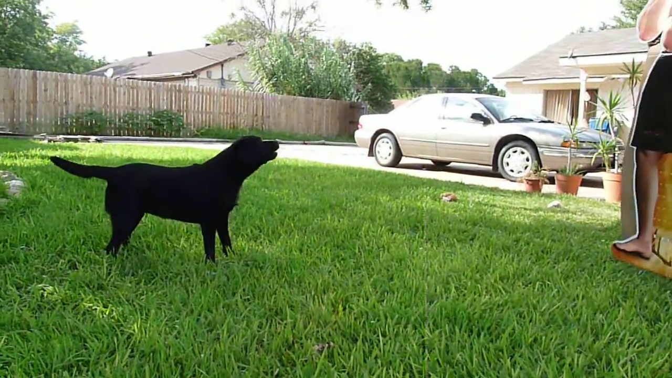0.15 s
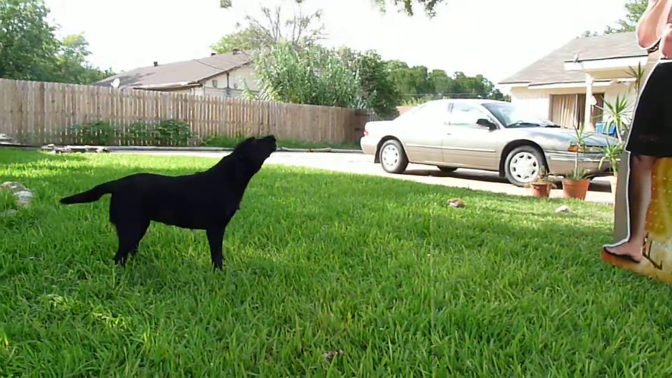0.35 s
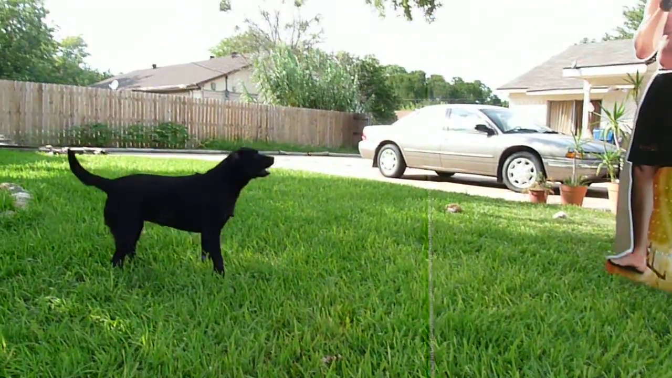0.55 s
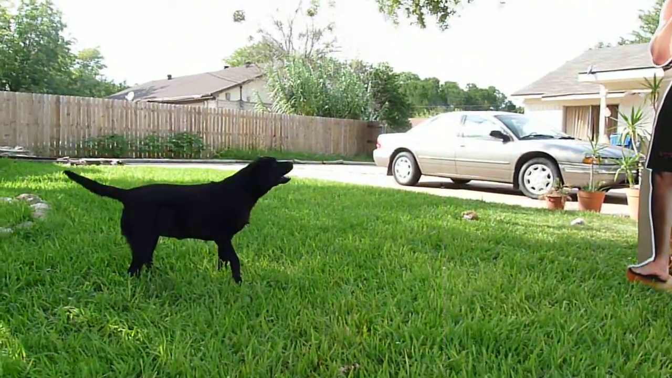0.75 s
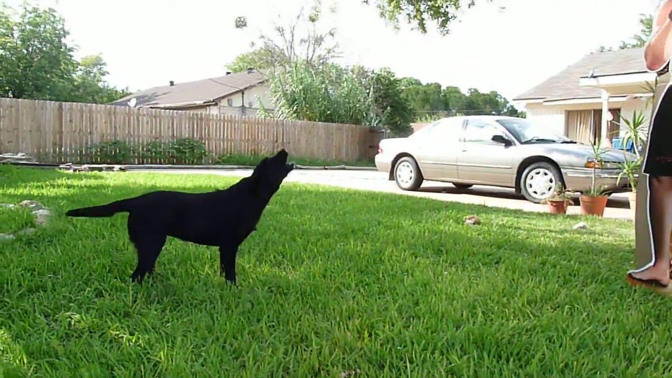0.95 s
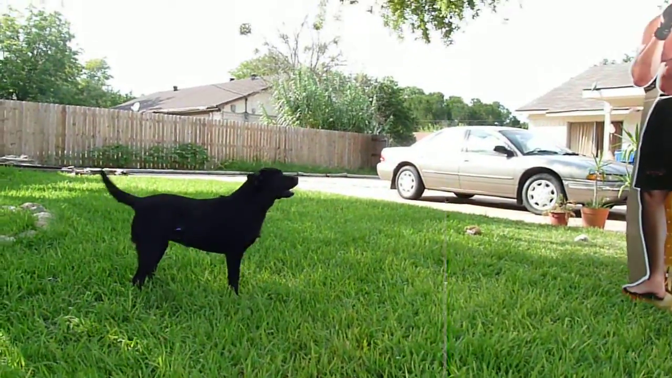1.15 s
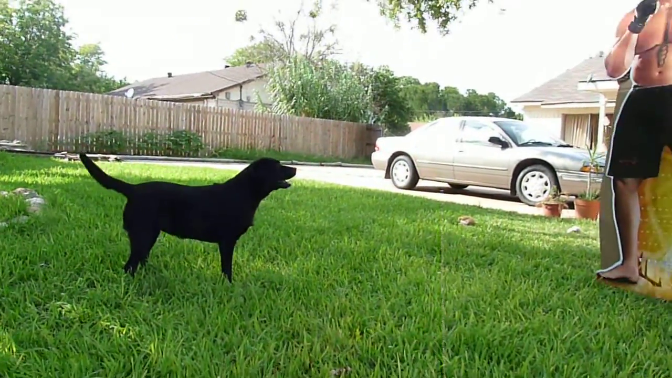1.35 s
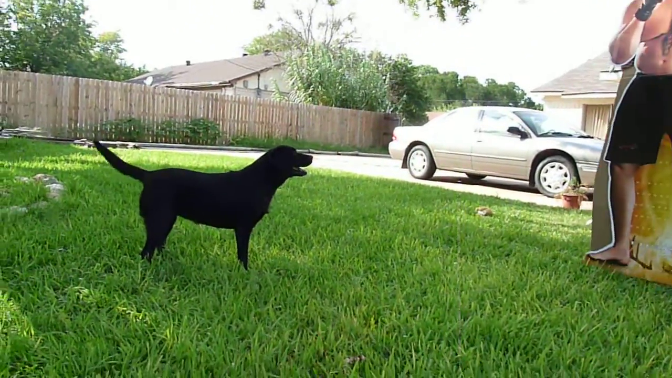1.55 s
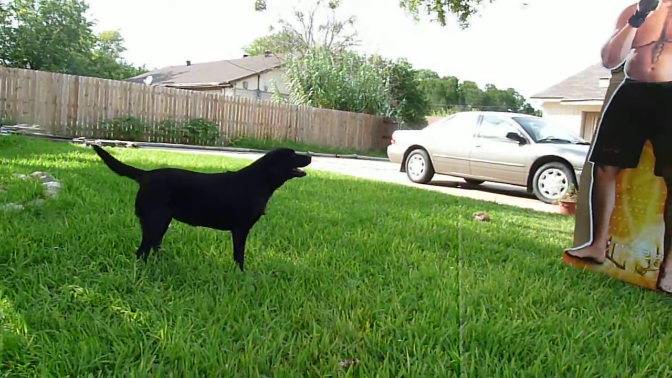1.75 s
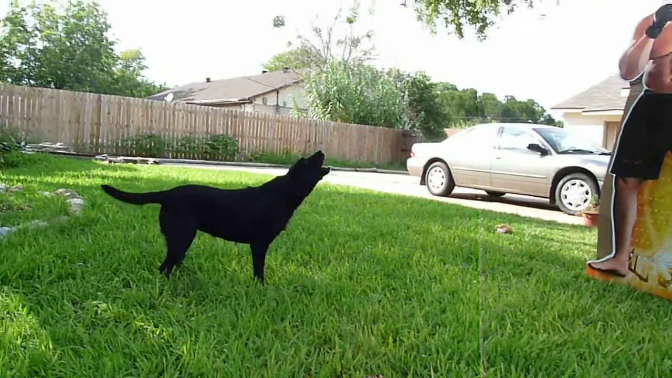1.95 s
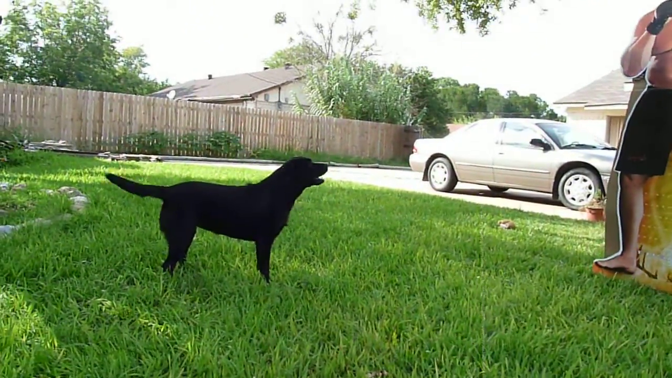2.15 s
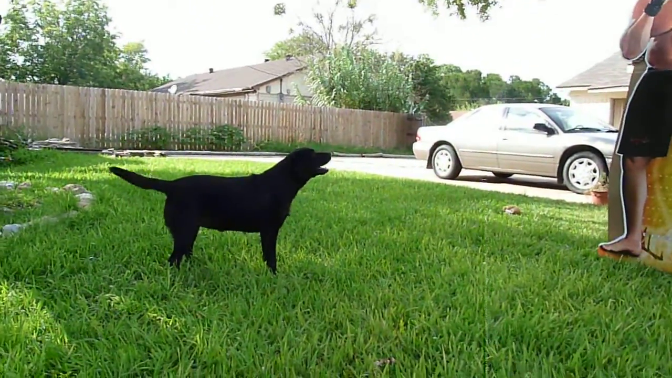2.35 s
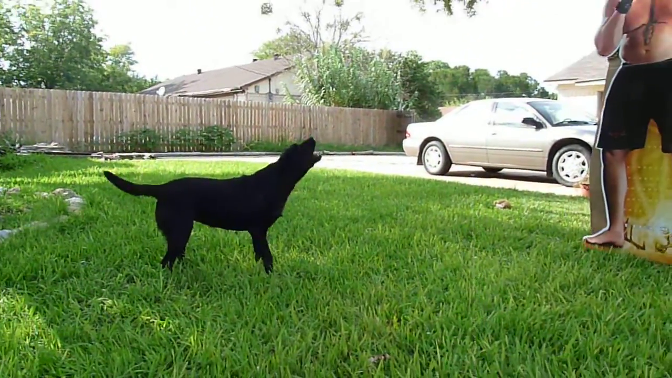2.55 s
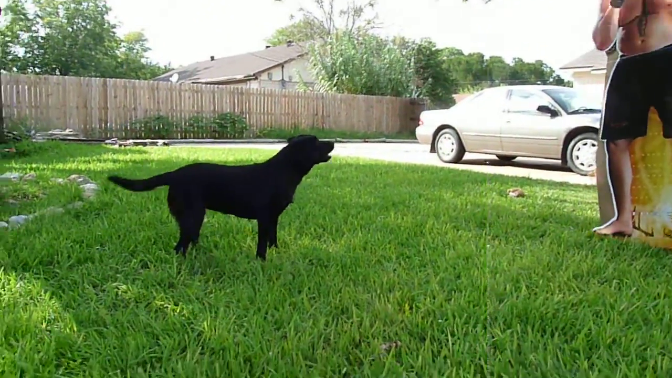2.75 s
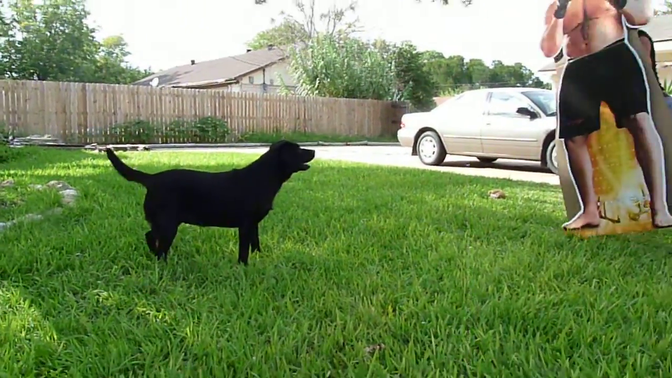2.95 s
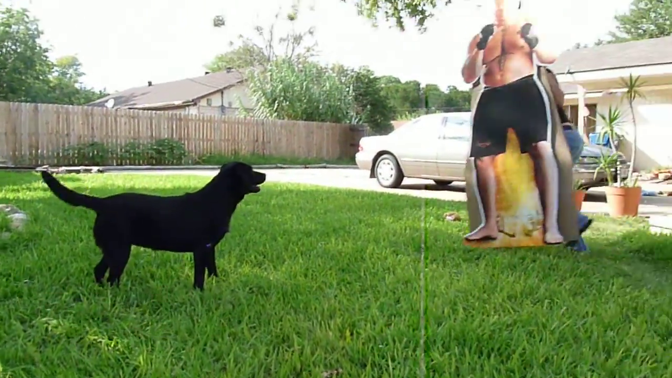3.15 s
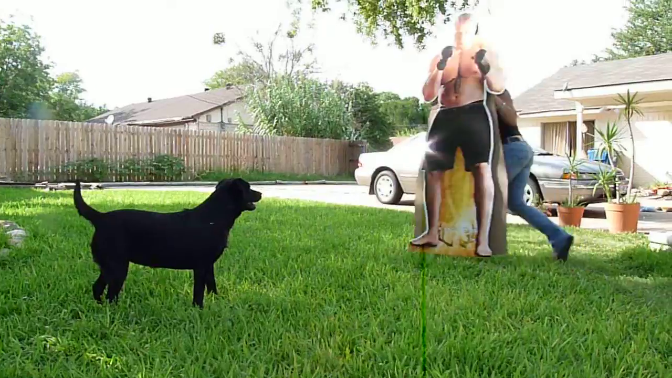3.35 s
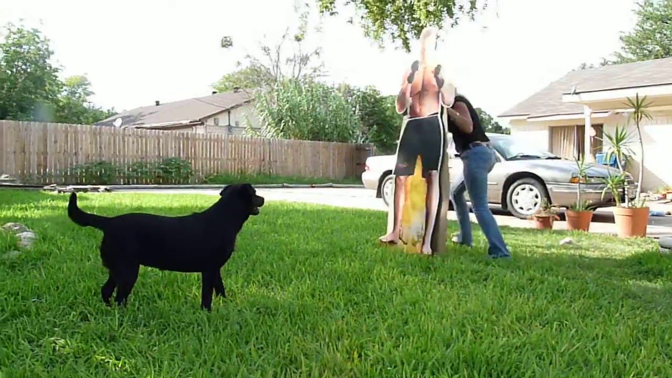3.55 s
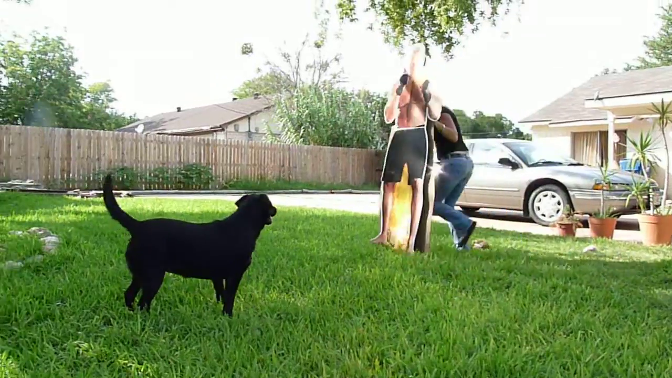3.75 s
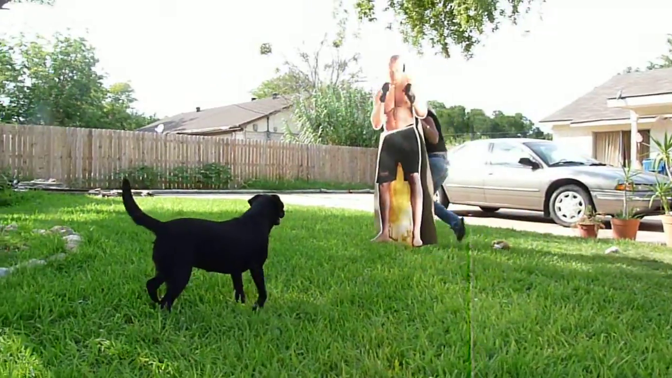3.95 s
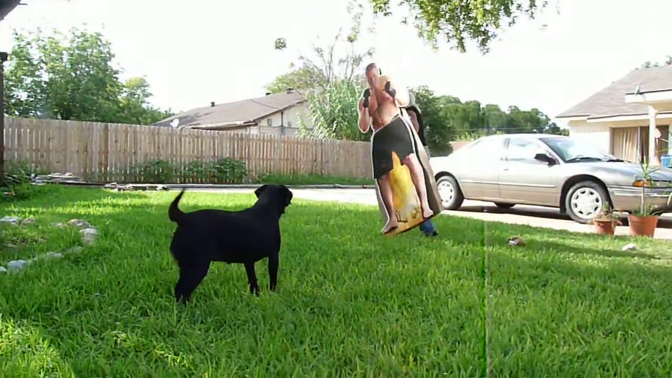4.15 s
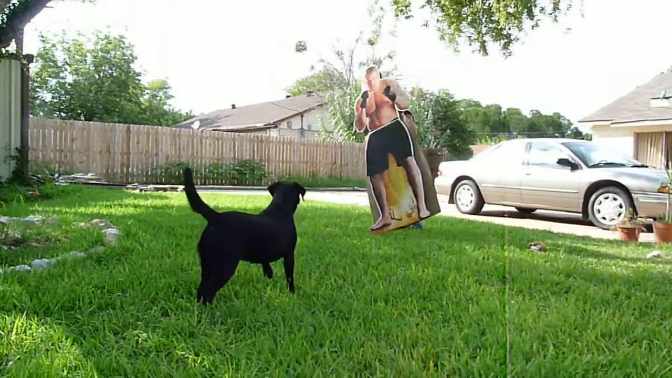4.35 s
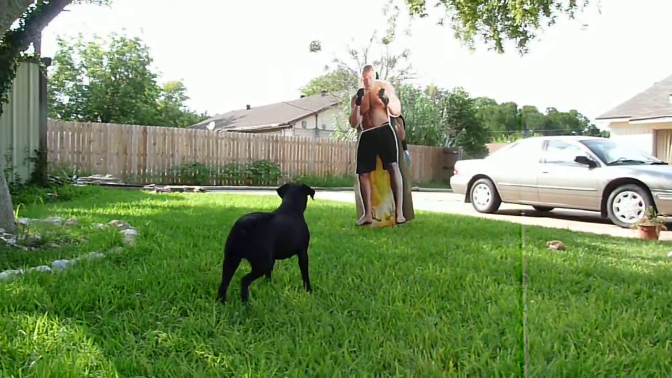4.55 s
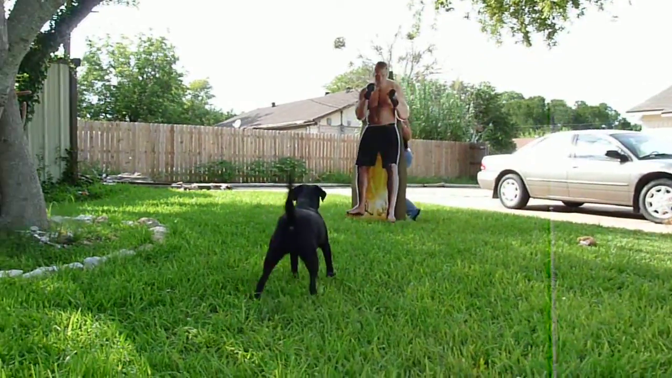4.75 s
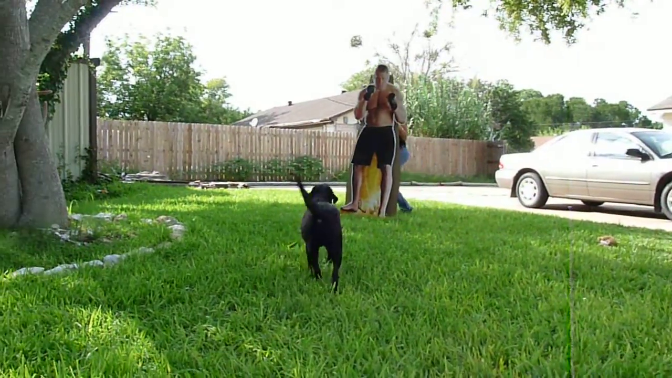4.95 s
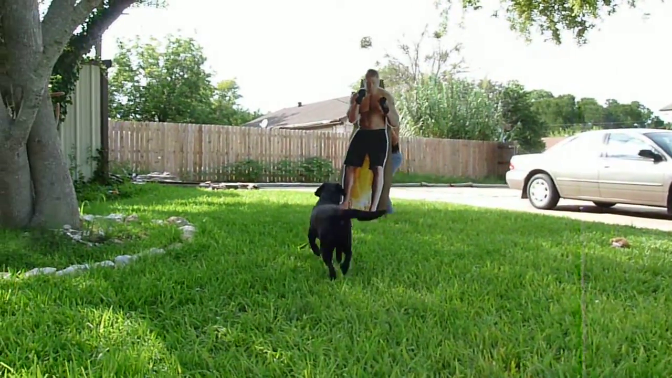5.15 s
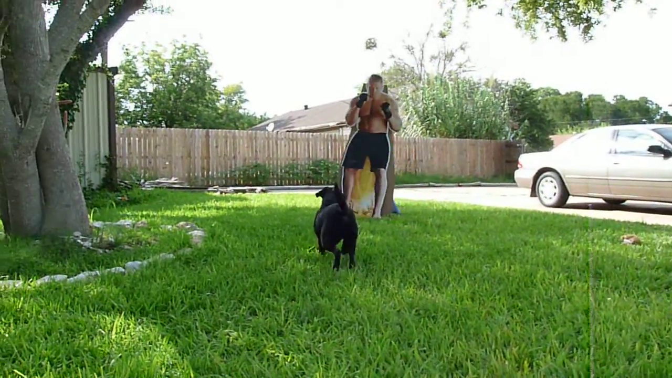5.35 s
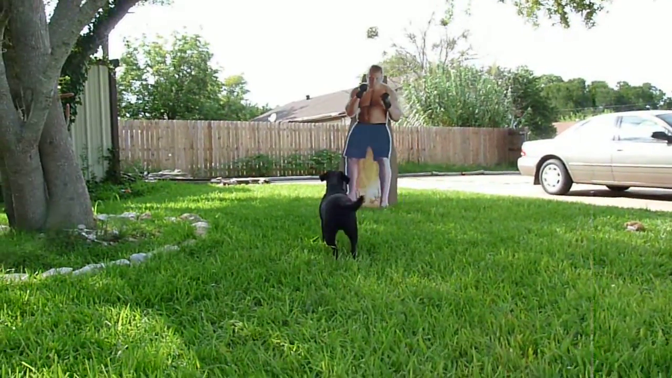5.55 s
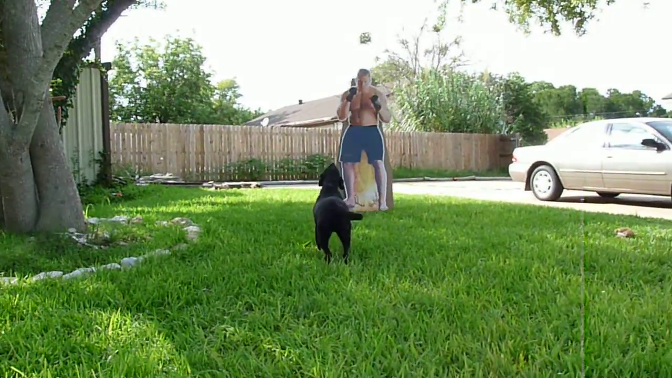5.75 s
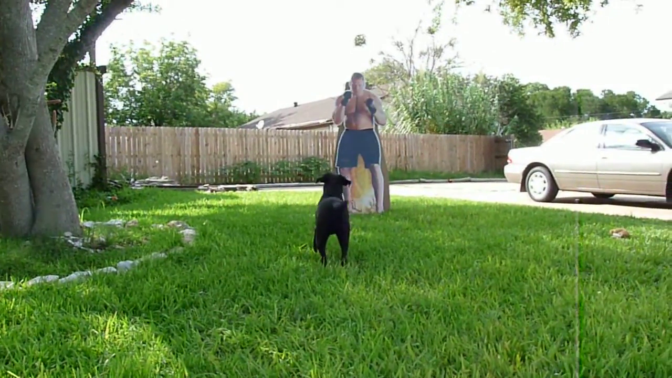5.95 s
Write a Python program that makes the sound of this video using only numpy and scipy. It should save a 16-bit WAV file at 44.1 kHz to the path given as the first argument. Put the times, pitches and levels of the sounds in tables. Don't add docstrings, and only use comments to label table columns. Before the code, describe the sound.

Big dog barking close by outdoors, four barks, a long lull, two more, with faint far-off replies, traffic rumble and a low hum.

```python
import sys
import numpy as np
from scipy import signal
from scipy.io import wavfile
from scipy.ndimage import uniform_filter1d

SR = 44100
rng = np.random.default_rng(int(sys.argv[2]) if len(sys.argv) > 2 else 0)


def elevation(decibels):
    levels = np.asarray(decibels, float)
    return 10 ** (levels / 20)


def generate_wav(sig):
    pcm = np.round(np.clip(np.atleast_2d(sig).T, -1, 1) * 32767).astype(np.int16)
    wavfile.write(sys.argv[1], SR, pcm)


N = 269010


def evened(x):
    return x / np.sqrt(np.mean(x ** 2) + 1e-20)


def read(points, hz):
    f, value = np.transpose(points)
    return np.interp(np.log(hz + 1), np.log(f + 1), value)


def add(mix, start_s, sound):
    part = mix[round(start_s * SR):][:len(sound)]
    part += sound[:len(part)]


def drift(count, smooth_s):
    span = max(int(smooth_s * SR), 2)
    return evened(uniform_filter1d(uniform_filter1d(rng.standard_normal(count), span), span))


def noise(spectrum, patchy_db):
    hz = np.fft.rfftfreq(1024, 1 / SR)
    real, imaginary, patches = rng.standard_normal((N // 256 + 5, 513, 3)).T
    patches = evened(uniform_filter1d(uniform_filter1d(patches, 8, 0), 16, 1))
    z = (real + 1j * imaginary) * elevation(read(spectrum, hz)[:, None] + patchy_db * patches)
    return evened(signal.istft(z, nperseg=1024, noverlap=768)[1][:N])


# start_s, gain_db
DUCKS = [
    (0, -17.5),
    (0.311, -26),
    (0.981, -23),
    (1.982, -26),
    (2.632, -25),
    (5.028, -13),
    (5.719, -20.5),
]
DUCK_S, GAIN_HOLD_S, RECOVER_DB_PER_S, FULL_GAIN_DB, KNEE_DB = .06, 0.13, 13, -4.5, 4.5


def camera_db(t):
    tick_s = .005
    clock = np.arange(0, N / SR + 1, tick_s)
    s, low_db = np.transpose(DUCKS)
    last = np.maximum(np.searchsorted(s, clock, "right") - 1, 0)
    climb_db = low_db[last] + RECOVER_DB_PER_S * np.maximum(clock - s[last] - GAIN_HOLD_S, 0)
    eased_db = FULL_GAIN_DB - KNEE_DB * np.logaddexp(0, (FULL_GAIN_DB - climb_db) / KNEE_DB)
    return np.interp(t, clock, uniform_filter1d(eased_db, int(DUCK_S / tick_s) + 1))


# pitch_hz, level_db
TRAFFIC = [(15, -53.5), (25, -42.5), (54, -19.5), (90, 5), (125, -5), (157, 2.5), (331, -5.5), (383, -9),
           (452, -4), (1120, -9.5), (2270, -30), (3500, -43), (4550, -73), (7700, -120)]
TRAFFIC_DB = -38


def traffic():
    return elevation(TRAFFIC_DB) * noise(TRAFFIC, patchy_db=1.2)


HUM_HZ, HUM_DB = 125.1, -36.5


def hum():
    turn = 2 * np.pi * np.cumsum(HUM_HZ * (1 + 0.0041 * drift(N, 0.45))) / SR
    return elevation(HUM_DB + 2.2 * drift(N, .025)) * np.sin(turn)


# pitch_hz, level_db
HISS = [(30, 2.5), (1000, 6.5), (3500, 0.4), (7000, 0.34), (7800, -2.5), (8400, -13), (9000, -44),
        (9600, -62)]
HISS_DB = -66


def hiss():
    return elevation(HISS_DB) * noise(HISS, patchy_db=-1.46)


# pitch_hz, level_db
WHINE = [(2665, -92), (3112, -96), (6665, -81.5)]


def whine(t):
    return sum(elevation(db - 1.0) * np.sin(2 * np.pi * hz * t) for hz, db in WHINE)


def resonate(x, hz, width):
    turn, r = np.exp(2j * np.pi * np.cumsum(hz) / SR), np.exp(-np.pi * width / SR)
    return 2 * (turn * signal.lfilter([1 - r], [1, -r], x * turn.conj() + 1e-18)).real


BRIGHT_PER_DB = -0.37
TOP_FOLLOWS_PITCH, HALF_LATE_S = .7, .03


def voice(rows, throat, rough, stress=0, every=3, edge=0.026, facing_db=0, half_db=-60, slack_hz=385):
    s, loud_db, hz, throat_hz, chest_db = np.transpose(rows)
    top_s = s[np.argmax(hz)]
    t = np.arange(s[0], s[-1], 1 / SR)
    loud_db, hz, throat_hz, chest_db = (np.interp(t, s, c) for c in (loud_db, hz, throat_hz, chest_db))

    closing = np.clip((t - top_s) / .03, 0, 1)
    rough = rough * (1 + closing) + .22 * closing + .85 * np.clip(1 - hz / slack_hz, 0, 1)
    turns = np.cumsum(hz * (1 + .2 * rough * drift(len(t), .003))) / SR
    folds = sum(np.cos(2 * np.pi * k * turns) * np.exp(-(k * hz / 3600) ** 4) for k in range(1, 24))
    folds = folds * (1 + 1.2 * rough * drift(len(t), .002))
    strain = np.clip((hz - 390) / 45 + closing, 0, 1)
    folds = folds * (1 + stress * strain * np.cos(2 * np.pi * turns / every))
    puffs = (0.97 + np.exp(-(turns % 1) / 0.37)) * rng.standard_normal(len(t))
    drive = folds + 7 * rough * puffs

    mouth = throat_hz / throat[0][0]
    shifts = [mouth] + [np.sqrt(mouth)] * (len(throat) - 2) + [(hz / hz.max()) ** TOP_FOLLOWS_PITCH]
    out = 0
    for k, (f, width, db) in enumerate(throat):
        bright_db = (k > 0) * BRIGHT_PER_DB * (loud_db - loud_db.max())
        ring = resonate(resonate(drive, f * shifts[k], width), f * shifts[k], width)
        out = out + (-1) ** k * elevation(db + k * facing_db / 2 + bright_db) * ring
    out = out / np.sqrt(abs(uniform_filter1d(out ** 2, 1300)) + 1e-6)

    late = np.clip((t - top_s - HALF_LATE_S) / HALF_LATE_S, 0, 1)
    half_pitch = elevation(half_db) * late * np.sin(np.pi * turns)
    body = sum(np.sin(2 * np.pi * k * turns) * np.exp(-((k - 1) * hz / 260) ** 2) for k in (1, 2, 3))
    chest = elevation(chest_db + 3 + 5 * rough * drift(len(t), .003)) * (half_pitch + body)
    return s[0], (elevation(loud_db) * out + chest) / elevation(camera_db(t)) * signal.windows.tukey(len(t), edge)


GROWL_SURGE_DB, GROWL_SURGE_S, GROWL_THROAT_HZ, GROWL_CHEST_DB, GROWL_CURL = 25.5, 0.014, 600, -1.5, 1.5


def growl_shape(start, end, low_hz, high_hz, loud_db):
    u = np.linspace(0, 1, 41)
    t = start + (end - start) * u
    surge_db = GROWL_SURGE_DB * np.exp((t - end) / GROWL_SURGE_S)
    hz = low_hz + (high_hz - low_hz) * u ** GROWL_CURL
    chest_db = loud_db + GROWL_CHEST_DB + surge_db / 2
    return np.transpose([t, loud_db + surge_db, hz, GROWL_THROAT_HZ + 0 * u, chest_db])


# pitch_hz, width_hz, level_db
THROAT = [(858, 286, 19.5), (1327, 1145, -9), (2186, 180, -15.5), (3150, 180, -32.5)]
# start_s, end_s, low_pitch_hz, high_pitch_hz, level_db
GROWLS = [
    (0.179, 0.264, 118, 223.6, -50.5),
    (0.884, 0.93, 134.7, 221, -53),
    (1.876, 1.935, 87.3, 174, -46.5),
    (2.517, 2.584, 115.6, 237, -56),
    (5.605, 5.678, 117.6, 200, -45),
]


def growls():
    out = np.zeros(N)
    for row in GROWLS:
        add(out, *voice(growl_shape(*row), THROAT, .2, edge=.12))
    return out


BARK_S, ATTACK_DB, HOLD_SAG_DB_PER_S = .22, 19.5, 14.5
PITCH_FALL_HZ, PITCH_FALL_S, PITCH_FALL_SHAPE = 190, .1, 1.7
CHEST_HOLD_S, CHEST_FADE_DB_PER_S = 0.15, 402
OPEN_S, PUNCH_S = 0.019, 0.022


def bark_shape(pitch, effort, attack_s, punch_db, shut):
    start, low_hz, aim_hz, rise_s, turn_s = pitch
    loud_db, hold_s, fade, chest_db, open_hz = effort
    u = np.linspace(0, BARK_S, 111)
    hz = aim_hz - (aim_hz - low_hz) * np.exp(-u / rise_s)
    hz = hz - PITCH_FALL_HZ * (np.maximum(u - turn_s, 0) / PITCH_FALL_S) ** PITCH_FALL_SHAPE
    attack_db = -ATTACK_DB * np.maximum(1 - u / attack_s, 0)
    loud_db = loud_db + attack_db - HOLD_SAG_DB_PER_S * u - fade * np.maximum(u - hold_s, 0)
    chest_db = chest_db + punch_db * np.exp(-(u / PUNCH_S) ** 2 / 2) + attack_db / 2
    chest_db = chest_db - CHEST_FADE_DB_PER_S * np.maximum(u - CHEST_HOLD_S, 0)
    throat_hz = open_hz * (1 - (1 - shut) * np.exp(-(u / OPEN_S) ** 2 / 2))
    return np.transpose([start + u, loud_db, hz, throat_hz, chest_db])


FALSE_PEAK_SHARE, FALSE_ENDS_DB, FALSE_CURL = 0.18, -13.5, 1.857


def false_shape(start, length, first_hz, last_hz, peak_db):
    u = np.linspace(0, 1, 41)
    dip = np.interp(u, [0, FALSE_PEAK_SHARE, 1], [1, 0, 1])
    hz = first_hz + (last_hz - first_hz) * u ** FALSE_CURL
    return np.transpose([start + length * u, hz, peak_db + FALSE_ENDS_DB * dip])


def false_folds(rows):
    s, hz, level_db = np.transpose(rows)
    t = np.arange(s[0], s[-1], 1 / SR)
    turn = 2 * np.pi * np.cumsum(np.interp(t, s, hz) * (1 + 0.03 * drift(len(t), 0.0039))) / SR
    tone = np.sin(turn) + 0.45 * np.sin(2 * turn) + 0.035 * np.sin(3 * turn)
    level = elevation(np.interp(t, s, level_db) + 5 - camera_db(t))
    return s[0], level * tone * signal.windows.tukey(len(t), .4)


def slaps(x, taps):
    out = np.append(x, np.zeros(SR // 2))
    for delay_s, db in taps:
        add(out, delay_s, elevation(db) * x)
    return out


# pitch_hz, t60_s
YARD = [(200, 0.64), (500, 0.33), (900, 0.75), (1400, 0.62), (2200, 0.88), (4000, 0.52)]
# pitch_hz, level_db
YARD_COLOUR = [(300, -1), (900, -4.5), (1400, 7.5), (2100, 2.5), (3000, -4.5)]


def yard(x, start_s):
    taps = np.zeros(SR)
    at = np.arange(0, SR - 40, 40)
    at_random = at + rng.integers(0, 40, len(at))
    taps[at_random] = rng.choice([-1., 1.], len(at)) * rng.exponential(1, len(at))
    hz, t, z = signal.stft(taps, SR, nperseg=256)
    fade_db = read(YARD_COLOUR, hz)[:, None] - 60 * t / read(YARD, hz)[:, None]
    tail = signal.istft(z * elevation(fade_db) * (t > start_s), SR, nperseg=256)[1]
    return signal.fftconvolve(x, tail / np.linalg.norm(tail))


# start_s, start_pitch_hz, aim_pitch_hz, rise_s, turn_after_s
BARKS = [
    (.254, 190, 467.5, 0.04, 0.13),
    (.925, 239.8, 457.1, 0.025, 0.14),
    (1.93, 177.4, 481.9, 0.041, 0.11),
    (2.575, 256.8, 488.7, 0.051, 0.088),
    (4.968, 175.9, 474.7, .04, .12),
    (5.676, 200, 451, 0.028, 0.12),
]
# level_db, hold_s, fade_db_per_s, chest_db, open_throat_hz
EFFORT = [(-20.5, .1, 230, -35, 738), (-20.5, 0.097, 330.5, -37.5, 816), (-19.5, 0.083, 220, -37, 810),
          (-20, 0.083, 277.5, -39.5, 823), (-20, 0.12, 300, -31, 812), (-20.5, 0.12, 295, -35, 800)]
ATTACKS_S = [0.031, .024, 0.021, 0.021, 0.021, 0.017]
# chest_punch_db, starting_throat (share of open), half_pitch_db
COLOUR = [(2, 0.76, -10.5), (4, 0.82, -14), (0, 0.83, -15), (0.5, 0.83, -16), (7.5, .98, 2), (2, .98, -8)]
TEMPER = [(.14, .7, 3), (.22, .8, 3), (.07, .0, 3), (.04, .0, 3), (.17, .4, 3), (.22, .75, 7)]
FACING_DB = [2, 3, 9.5, 9.5, 3, -1.5]
# start_s, length_s, first_pitch_hz, last_pitch_hz, peak_db
FALSE_FOLDS = [(.35, 0.07, 553, 414, -32), (0.984, .11, 593.4, 383, -29.5),
               (2.034, 0.053, 559.4, 391, -30.5), (2.669, 0.033, 540.5, 600, -29.5),
               (5.071, .09, 556.5, 368.5, -29.5), (5.75, .11, 524, 330, -37.5)]
# delay_s, level_db
EARLY = [(.0075, -12.5), (.012, -10), (.0175, -16.5), (.03, -15)]
# fence_delay_s, fence_db, house_delay_s, house_db
WALLS = [(0.041, -9, .16, -42), (0.12, -29.5, 0.058, -18.5), (0.03, -8, 0.8, -29.5), (.08, -22, 0.26, -56),
         (0.07, -13, 0.17, -17), (0.036, -18.5, 0.17, -28)]
YARD_DB = [-16.5, -17.5, -17, -16.5, -11, -14]
WALL_LOW_HZ = 620


def barks():
    out = np.zeros(N)
    each = zip(BARKS, EFFORT, ATTACKS_S, COLOUR, TEMPER, FACING_DB, FALSE_FOLDS, WALLS, YARD_DB)
    for pitch, effort, attack_s, colour, temper, facing_db, second, walls, yard_db in each:
        punch_db, shut, half_db = colour
        fence_s, fence_db, house_s, house_db = walls
        shape = bark_shape(pitch, effort, attack_s, punch_db, shut)
        s, bark = voice(shape, THROAT, *temper, edge=0.07, facing_db=facing_db, half_db=half_db)
        false_s, tone = false_folds(false_shape(*second))
        add(bark, false_s - s, tone)
        moved = [(delay_s * rng.uniform(.8, 1.25), db) for delay_s, db in EARLY]
        add(out, s, slaps(bark, moved))
        thin = signal.lfilter(*signal.butter(2, WALL_LOW_HZ, "high", fs=SR), bark)
        add(out, s + fence_s, elevation(fence_db) * thin)
        add(out, s + house_s, elevation(house_db) * thin)
        add(out, s, elevation(yard_db) * yard(bark, .015))
    return out


# start_s, length_s, first_pitch_hz, last_pitch_hz, peak_db
CATCHES = [
    (.93, 0.062, 450, 580, -24),
    (1.908, 0.036, 591, 610, -39),
    (2.555, .04, 527, 570, -33.5),
    (5.676, .026, 401, 430, -26),
]


def catches():
    out = np.zeros(N)
    for row in CATCHES:
        s, tone = false_folds(false_shape(*row))
        add(out, s, slaps(tone, EARLY))
    return out


FAR_ARCH_SHARE, FAR_ENDS_DB, FAR_SKEW, FAR_SETTLE = 0.18, -12.5, .8, 0.45


def far_shape(start, length, loud_db, top_hz, chest_db):
    u = np.linspace(0, 1, 41) ** FAR_SKEW
    dip = 1 - np.sin(np.pi * u)
    hz = top_hz * (1 - FAR_ARCH_SHARE * dip * np.where(u > .5, FAR_SETTLE, 1))
    t = start + length * u ** (1 / FAR_SKEW)
    return np.transpose([t, loud_db + FAR_ENDS_DB * dip, hz, hz * 2, chest_db + 0 * u])


# start_s, length_s, level_db, top_pitch_hz, chest_db
FAR_BARKS = [
    (1.217, .16, -48.5, 356.7, -68),
    (2.252, 0.16, -47, 361, -67),
    (4.469, .16, -35, 354.9, -50.5),
    (6.025, .15, -43, 368.5, -63.5),
]
# pitch_hz, width_hz, level_db
FAR_THROAT = [(680, 208, 3), (1198, 256, -12.5), (1550, 406, -22)]
# roughness (0-1), upper_resonances_db
FAR_TEMPER = [(.06, 0), (.06, -1), (.26, 7), (.07, 4)]


def far_dog():
    out = np.zeros(N)
    for row, (rough, facing_db) in zip(FAR_BARKS, FAR_TEMPER):
        s, bark = voice(far_shape(*row), FAR_THROAT, rough, edge=.25, facing_db=facing_db, slack_hz=310)
        add(out, s, elevation(4.5) * bark)
        add(out, s, elevation(-5.5) * yard(bark, .012))
    return out


def scene():
    return (traffic() + hum() + growls() + barks() + catches() + far_dog())[None]


def band_limit(x):
    return signal.sosfilt(signal.butter(12, 8880, fs=SR, output="sos"), x)


CEILING, OFFSET = .25, -.0055


def record(dry):
    t = np.arange(N) / SR
    x = dry * elevation(camera_db(t))
    swing = uniform_filter1d(abs(signal.hilbert(x)), size=60)
    x = x / (1 + (swing / CEILING) ** 4) ** .25
    sag = uniform_filter1d(x ** 2, size=900, origin=400)
    x = x - .2 * x ** 2 - .55 * sag + OFFSET
    return band_limit(x + hiss() + whine(t))


dry = scene()
out = record(dry)
generate_wav(out)
```